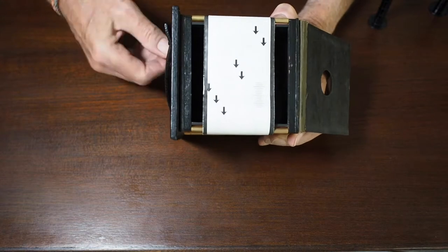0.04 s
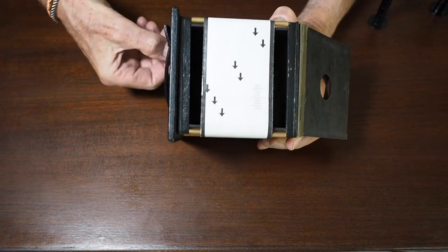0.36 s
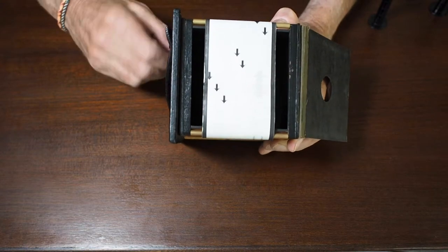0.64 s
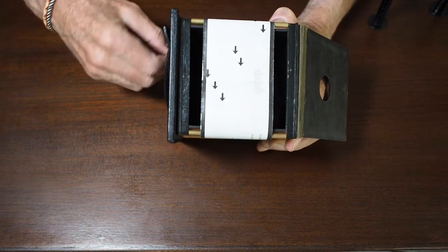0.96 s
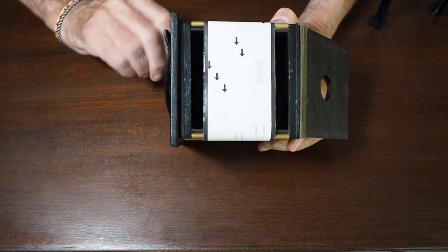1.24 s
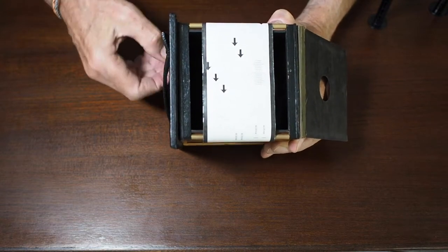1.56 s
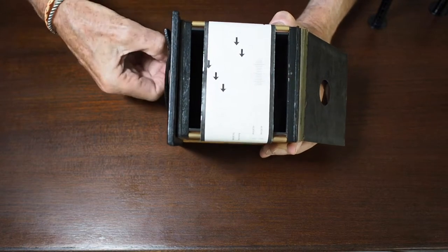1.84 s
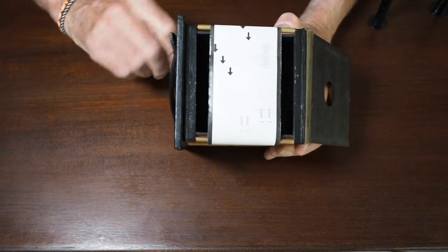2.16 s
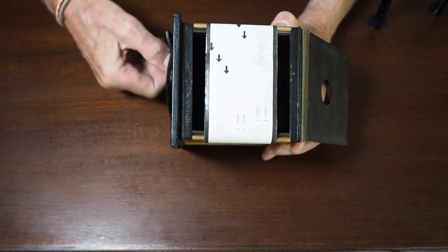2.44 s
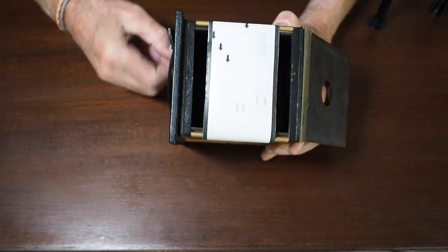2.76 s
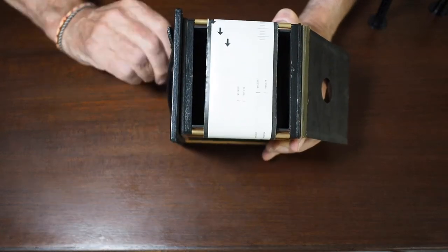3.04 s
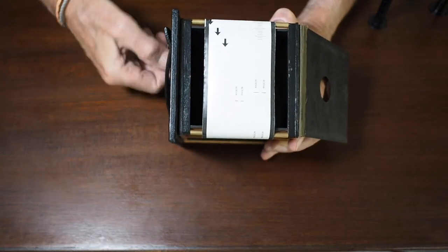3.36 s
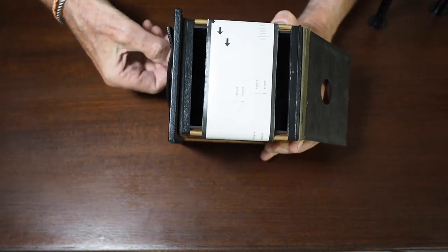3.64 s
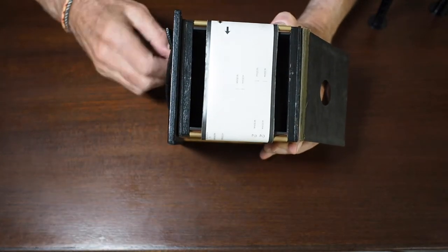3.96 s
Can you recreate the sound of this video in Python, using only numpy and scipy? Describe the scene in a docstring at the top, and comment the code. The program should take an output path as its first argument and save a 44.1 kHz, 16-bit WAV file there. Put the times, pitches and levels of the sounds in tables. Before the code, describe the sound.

The winding key of an old box camera ratchets in five short bursts of sharp metallic clicks. Soft knocks and faint finger rubs fall between turns, close to the microphone in a small, quiet room.

```python
"""The winding key of an old box camera, turned in five bursts close to a stereo microphone,
over a table in a small, quiet room. A pawl scrapes up each ratchet tooth and snaps down, ringing
the key plate and body; in the fourth burst the metal squeaks very high. Between turns the key
knocks in its play and fingers slide to a new grip; now and then the hand bumps the hollow box.
Behind it are reflections off the table, a short room decay and room tone with a low hum."""
import sys
import numpy as np
from scipy import signal
from scipy.fft import rfft, irfft
from scipy.io import wavfile
from scipy.ndimage import uniform_filter1d

SR = 44100
rng = np.random.default_rng(int(sys.argv[2]) if len(sys.argv) > 2 else 0)


def master(y):
    """Save y as 16-bit WAV."""
    cut = np.clip(np.atleast_2d(y).T, -1, 1)
    pcm = np.round(cut * 32767)  # scale
    wavfile.write(sys.argv[1], SR, pcm.astype(np.int16))


N = 4 * SR

# one snap per ratchet tooth: t/s, relative level/dB, treble/dB, favoured ring f/Hz
TEETH = [(0.3524, -27.5, 2.5, 4800), (0.3795, -30, -2.5, 7860), (0.4134, -26, 1, 4960),
         (0.451, -26, 1, 4030), (0.4697, -24.5, -1, 4360), (0.4823, -23.5, -1, 4050),
         (0.4956, -28, 6, 4900), (0.5088, -25.5, -11, 4670), (0.5289, -29.5, 3, 4180),
         (0.5466, -26, 1, 3920), (0.5618, -26.5, -4, 6350), (0.5767, -25.5, 0, 1400),
         (0.59, -26.5, -2, 1290), (0.602, -25.5, -6, 8800), (0.623, -29.5, 5, 1650),
         (0.6453, -28.5, -1.5, 8950), (0.666, -25.5, -0.5, 2580), (0.6853, -27.5, -4.5, 9350),
         (1.0239, -28, -3, 8900), (1.041, -26, 2.5, 1940), (1.0534, -27, 3, 1940),
         (1.0651, -29, -3.5, 9800), (1.0754, -30, 1, 8500), (1.086, -27.5, -1, 8950),
         (1.0984, -27.5, -1.5, 8900), (1.1114, -24.5, 0, 4950), (1.124, -24, 1, 2940),
         (1.135, -22.5, -2, 2330), (1.1474, -26, -0.5, 5000), (1.1694, -29, -1.5, 1370),
         (1.8566, -26, 3, 2300), (1.8716, -25, 0, 3470.0), (1.889, -26, -0.5, 2270),
         (1.9125, -26.5, -1.5, 4650), (1.9356, -25, -7, 5540), (1.9513, -24.5, 0.5, 3270),
         (1.9641, -26.5, 1, 3020), (1.973, -23.5, -5, 5100), (1.9805, -26.5, 3, 5200),
         (1.9876, -27, -1, 5260), (1.9932, -29, 0, 2800), (2.0002, -32, 2, 2800), (2.007, -27.5, -6, 5040),
         (2.0135, -28.5, 0, 5100), (2.02, -36, 4, 8140.0), (2.0268, -33.5, 5.5, 6700),
         (2.034, -27, -5, 5650), (2.0418, -31, -0.5, 7140), (2.0483, -28, -1, 4500), (2.0565, -35, 7, 2900),
         (2.0695, -30, -1.5, 1610), (2.6194, -27, 1.5, 4560), (2.6402, -24.5, 0.5, 3830),
         (2.664, -23, -2, 3920.0), (2.679, -26, -1, 4100), (2.6998, -23, -2, 3930),
         (2.7193, -27.5, 3, 3700), (2.732, -25, -5, 7600), (2.7471, -24, -3, 4350.0),
         (2.759, -27, 0.5, 6040), (2.7705, -25, 1, 1380), (2.7834, -29, 1, 1360), (2.802, -26, -1, 1400),
         (2.8183, -24.5, -5, 6700), (2.8296, -26, -3.5, 6700.0), (2.8402, -23.5, 4, 5460),
         (2.849, -26, 0, 2720), (2.8574, -25.5, -6, 9260.0), (2.8665, -27.5, 4, 1540),
         (2.8777, -26, -10, 6500), (2.8932, -28, 3, 4400), (2.9133, -28, 0, 4440), (2.9293, -28, 2.5, 1840),
         (2.9491, -32, -1.5, 7160), (3.6334, -26, 0, 1430), (3.658, -29, 3, 2380),
         (3.6916, -28.5, -3, 6070), (3.7309, -25.5, 0, 2640), (3.7598, -25.5, -2, 3820),
         (3.7832, -29, -3, 6660), (3.8048, -27.5, 0, 2780), (3.8268, -24.5, -2.5, 2340),
         (3.8477, -25.5, -1, 2960), (3.8673, -26, -2, 5100), (3.8821, -25.5, -4, 9600),
         (3.8958, -28, 1, 3500), (3.9203, -26.5, -3, 3500), (3.954, -26.5, -0.5, 3350),
         (3.9744, -26.5, 1, 3510.0), (3.9934, -26.5, 0.5, 1820)]
# spectrum of the pawl on a tooth: f/Hz, level/dB
PAWL_COLOUR = [(100, -38), (400, -14.5), (800, -4), (1850, -1), (4400, -2.8), (6500, -0.1), (8000, -1.5),
               (11000, 2.5), (13500, 1), (16000, -2.5)]


def amp(db):
    """Decibels to gain."""
    return 10 ** (np.asarray(db) / 20)


def unit(x):
    """Scales to rms 1."""
    return x / np.sqrt(np.mean(x ** 2) + 1e-20)


def read(points, hz):
    """Reads a table on a log-frequency axis."""
    f, value = np.transpose(points)
    return np.interp(np.log(hz + 1), np.log(f + 1), value)


def add(mix, s, sound):
    """Mixes a sound in at s seconds."""
    part = mix[..., max(round(s * SR), 0):][..., :sound.shape[-1]]
    part += sound[..., :part.shape[-1]]


def freqs(size):
    """Frequencies of a spectrum."""
    return np.fft.rfftfreq(size, 1 / SR)


def peak(hz, centre, width):
    """Bell shape of one resonance, top 1."""
    return 1 / (1 + (2 * (hz - centre) / width) ** 2)


def flatten(z, bins):
    """Evens out a spectrum, keeping its fine detail."""
    return z / np.sqrt(uniform_filter1d(abs(z) ** 2, size=bins, axis=1))


def minimum_phase(db):
    """Causal response of a dB spectrum."""
    log_gain = np.log(amp(np.r_[db, db[-2:0:-1]]))
    return np.exp(np.conj(signal.hilbert(log_gain)))[:len(db)]


def pair(z, likeness, hz):
    """Two unrelated spectra become left and right with a given correlation."""
    c = np.clip(read(likeness, hz), -.999, .999)
    mid, side = z[0] * np.sqrt((1 + c) / 2), z[1] * np.sqrt((1 - c) / 2)
    return np.array([mid + side, mid - side])


def noise(colour, size):
    """Coloured stereo noise, wide in the treble."""
    likeness = [(100, 0.79), (500, 0.89), (1500, 0.85), (4000, 0.24), (12000, 0.063)]  # stereo image: f/Hz, left-right correlation
    hz, white = freqs(size), rfft(rng.standard_normal((2, size)))
    return unit(irfft(pair(white, likeness, hz) * amp(read(colour, hz)), size))


def room_tone():
    """Steady room noise with a low, wavering hum."""
    colour = [(15, -49), (25, -19), (64, -13), (84, -8.5), (145, -1.5), (270, -7), (354, -6), (545, -4),
              (796, -5.5), (1370, -9.5), (2050, -15.5), (3520, -20), (5880, -23.5), (16000, -30.5)]  # room noise spectrum: f/Hz, relative level/dB
    tones = [(98, -66.5)]  # hum: f/Hz, level/dB
    t, hum = np.arange(N) / SR, 0
    for hz, db in tones:
        drift = np.interp(t, np.linspace(0, N / SR, 40), rng.standard_normal(40))
        hum += amp(db) * unit((1 + 1.36 * drift) * np.sin(2 * np.pi * hz * t + drift))
    return amp(-50) * noise(colour, N) + hum


def room_tail(size=32768, table_s=.0075, table_fall_s=.0023):
    """A cluster of reflections off the table top, then the short decay of the room."""
    decay = [(3000, 0.32), (6000, 0.34), (11000, 0.28), (16000, 0.2)]  # reverberation time: f/Hz, T60/s
    colour = [(200, 9.5), (1000, -3.5), (3000, -3), (6000, -4), (11000, -4.5), (16000, -5.5)]  # reflected spectrum: f/Hz, level/dB
    likeness = [(1200, 1), (2800, 1), (5500, 0.45), (9000, 0.072), (15000, 0.085)]  # image of the reflections: f/Hz, left-right correlation
    hz, t, bands = signal.stft(rng.standard_normal((2, size)), SR, nperseg=256)
    t60 = read(decay, hz)[:, None]
    tail = signal.istft(bands * amp(-60 * t / t60), SR, nperseg=256)[1][:, :size]
    t, hz = np.arange(size) / SR, freqs(size)
    table_lift = 1 + 1.45 * np.exp(-abs(t - table_s) / table_fall_s)
    spectrum = flatten(rfft(tail * (t > table_s) * table_lift), bins=36)
    return irfft(pair(spectrum, likeness, hz) * amp(read(colour, hz)), size)[:, :size * 3 // 4]


def room(x, count=8):
    """The reflections change slowly as the camera shifts in the hand."""
    place = np.linspace(0, count - 1, N)
    fades = [np.sin(np.pi / 2 * np.maximum(1 - abs(place - k), 0)) for k in range(count)]
    return sum(signal.oaconvolve(x * fade, room_tail(), axes=1)[:, :N] for fade in fades)


def finger_rubs():
    """Fingers slide to a new grip in faint swells of friction noise."""
    rubs = [(1.361, 0.15, -56.5), (1.68, 0.11, -57.5), (2.442, 0.12, -53), (3.13, 0.083, -57),
            (3.321, 0.096, -58)]  # slides: t/s, length/s, peak level/dB
    colour = [(600, -13), (1500, 7), (3200, 4.5), (7000, 2), (16000, -19)]  # friction spectrum: f/Hz, level/dB
    out = np.zeros((2, N))
    for s, length, db in rubs:
        swell = np.hanning(round(length * SR))
        add(out, s, amp(db) * swell * noise(colour, SR)[:, :len(swell)])
    return out


def hand_bumps(rise_s=.0013, detune=.07):
    """Soft bumps ring the hollow box, its pitch shifting with the grip."""
    bumps = [(.303, -60, 28), (.588, -39.5, -1), (1.435, -52, 15.5), (1.467, -43, 5.5),
             (1.826, -53.5, 16.5), (1.955, -47.5, 4), (2.773, -54, 25), (2.875, -51, -2), (2.985, -55, 18)]  # hand on the box: t/s, level/dB, tilt/(dB per octave)
    modes = [(149.8, -4, 0.35), (299, -5, 0.17), (364.7, 0, 0.31), (540, -5, 0.07), (623, 2, 0.12)]  # box modes: nominal f/Hz, relative level/dB, T60/s
    out, t = np.zeros((2, N)), np.arange(SR // 2) / SR
    for s, db, tilt in bumps:
        grip = 1 + detune * rng.uniform(-1.14, 1)
        ring = 0
        for hz, level, t60 in modes:
            envelope = amp(level + tilt * np.log2(hz / 366) - 60 * t / t60)
            ring += envelope * np.sin(2 * np.pi * (hz * grip * t + rng.random()))
        add(out, s, amp(db) * ring * np.minimum(t / rise_s, 1))
    return out


def strike(grain, colour_db, ringing, hold_s, treble_fall_s, body_fall_s=.0035, body_hz=3850):
    """A few milliseconds of chatter ring the body; the treble dies first."""
    modes = [(610, 90, 2.5), (1400, 110, 2), (1550, 170, 5), (1740, 130, -4), (2260, 210, 6.5),
             (2950, 380, 3.8), (3550, 220, 4.5), (4600, 110, 3), (5100, 380, 3.5), (6850, 130, 5),
             (12950, 800, 5)]  # key plate and body resonances: f/Hz, width/Hz, lift/dB at ringing 1
    likeness = [(2500, 1), (6000, 0.95), (10000, 0.73), (16000, 0.74)]  # image at the microphone: f/Hz, left-right correlation
    size = grain.shape[1]
    t, hz = np.arange(size) / SR, freqs(size)
    after = np.maximum(t - hold_s, 0)
    body = rfft(grain * np.exp(-after / body_fall_s))
    treble = rfft(grain * np.exp(-after / treble_fall_s))
    low = 1 / (1 + (hz / body_hz) ** 4)
    chatter = flatten(low * body + (1 - low) * treble, bins=110)
    db = colour_db + ringing * sum(lift * peak(hz, f, width) for f, width, lift in modes)
    mid_gain = np.sqrt(np.mean(amp(db[(hz > 900) & (hz < 6000)]) ** 2))
    return irfft(pair(chatter, likeness, hz) * minimum_phase(db))[:, :size // 2] / mid_gain


def key_knocks(ringing, size=4096, gain_db=28):
    """The key knocks dully in its play, and once gives a faint, very high tick."""
    knocks = [(0.3025, -35.5, 1, 590), (1.3131, -29.5, 4, 2200), (1.7997, -56, 40, 12800),
              (1.833, -40.5, -3, 520), (2.234, -32, 4.5, 640), (3.154, -43.5, 4, 1510),
              (3.6071, -24.5, -5, 1370)]  # key knocks: t/s, relative level/dB, treble/dB, favoured ring f/Hz
    spectrum = [(100, -23), (350, -16), (650, -3.5), (1050, 0.5), (1500, 2.5), (1850, -0.5), (2300, 0.5),
                (3500, -7), (4600, -7.5), (6600, -9), (8500, -22.5), (16000, -28)]  # colour of a knock: f/Hz, level/dB
    out, hz = np.zeros((2, N)), freqs(size)
    for s, db, treble_db, ring_hz in knocks:
        colour = read(spectrum, hz) + read([(2500, 0), (12000, treble_db)], hz)
        colour += ringing * 5 * peak(hz, ring_hz, width=420)
        grain = rng.standard_normal((2, size))
        knock = strike(grain, colour, ringing, hold_s=.0033, treble_fall_s=.0013)
        add(out, s, amp(db + gain_db) * knock)
    return out


def metal_squeaks(waver_depth=.0049):
    """Thin, very high metal squeaks swell and fade among the snaps of the fourth burst."""
    squeaks = [(2.803, 0.01, -27, 12690), (2.816, 0.02, -18, 12750), (2.842, 0.0094, -21, 12900)]  # metal squeaks: t/s, length/s, level/dB, f/Hz
    out = np.zeros(N)
    for s, length, db, hz in squeaks:
        progress = np.linspace(0, 1, round(length * SR))
        swell = np.sqrt(2 * abs(np.sin(np.pi * progress ** 1.9)))
        waver = unit(uniform_filter1d(rng.standard_normal(N), size=100))[:len(swell)]
        phase = 2 * np.pi * np.cumsum(hz * (1 + waver_depth * waver)) / SR
        add(out, s, amp(db) * swell * np.sin(phase))
    return out


def pawl_scrapes(length_s=.009, gain_db=-21):
    """The pawl grates up the back of each tooth, harder until it drops."""
    out, size = np.zeros((2, N)), round(length_s * SR)
    for s, db, _, _ in TEETH:
        grit = noise(PAWL_COLOUR, SR // 10)[:, :size]
        add(out, s - length_s, amp(db + gain_db) * np.linspace(0, 1, size) ** 2 * grit)
    return out


def ratchet(ringing, likeness, size=4096, gain_db=26.5):
    """The pawl snaps off each tooth with its own ring; likeness ties its chatter to the last snap."""
    out, hz = np.zeros((2, N)), freqs(size)
    grain = rng.standard_normal((2, size))
    for s, db, treble_db, ring_hz in TEETH:
        grain = likeness * grain + np.sqrt(1 - likeness ** 2) * rng.standard_normal((2, size))
        colour = read(PAWL_COLOUR, hz) + read([(3500, 0), (9000, treble_db)], hz)
        colour += ringing * 7 * peak(hz, ring_hz, width=480) + 3 * peak(hz, ring_hz, width=1600)
        snap = strike(grain, colour, ringing, hold_s=.0021, treble_fall_s=.0018)
        add(out, s, amp(db + gain_db) * snap)
    return out


def scene():
    """The camera up close; its resonances stand out more toward the microphone than toward the walls."""
    mic_ringing, wall_ringing = 1.15, .55
    squeaks = metal_squeaks()
    direct = ratchet(mic_ringing, likeness=.61) + pawl_scrapes() + key_knocks(mic_ringing) + squeaks
    to_walls = ratchet(wall_ringing, likeness=0) + key_knocks(wall_ringing) + squeaks
    return direct + room(to_walls) + hand_bumps() + finger_rubs() + room_tone()


def record(dry):
    """The recorder cuts off the microphone signal above 15.8 kHz."""
    lowpass = signal.firwin(511, 15800, window=("kaiser", 9), fs=SR)
    return signal.oaconvolve(dry, lowpass[None], "same")


dry = scene()
out = record(dry)
master(out)
```